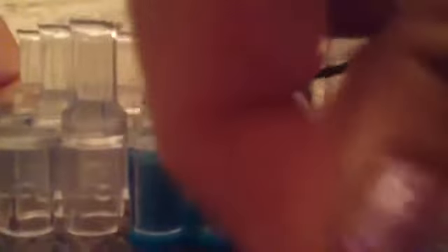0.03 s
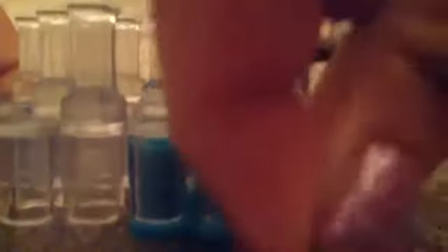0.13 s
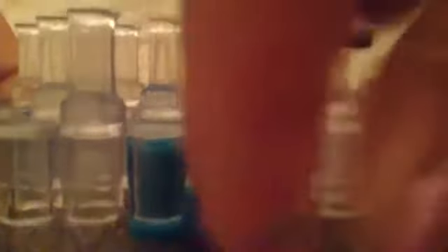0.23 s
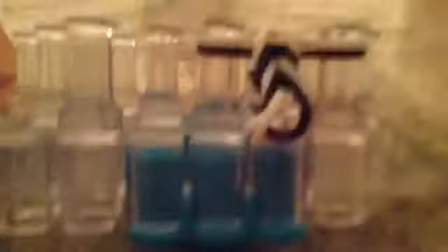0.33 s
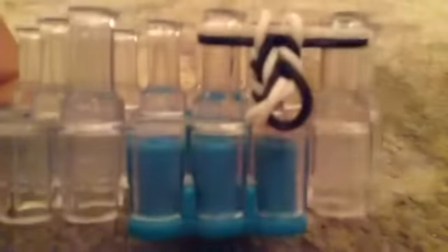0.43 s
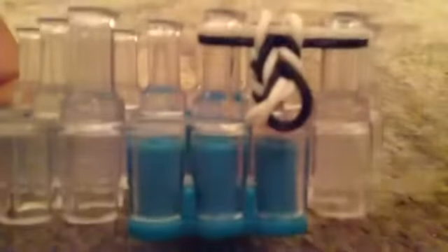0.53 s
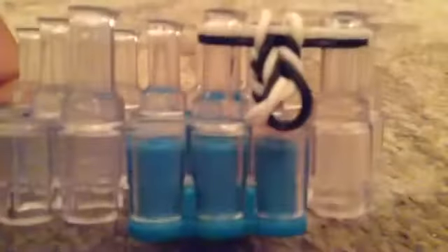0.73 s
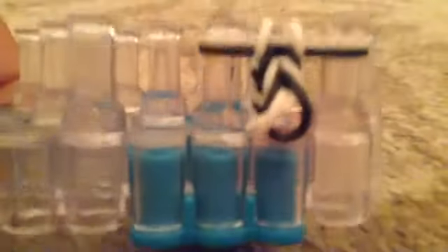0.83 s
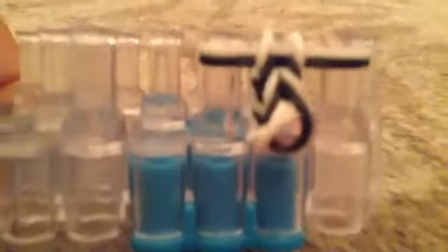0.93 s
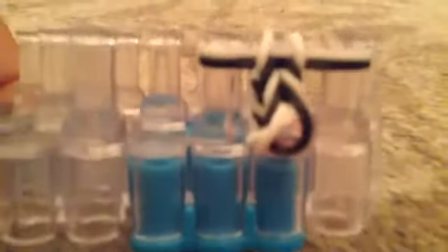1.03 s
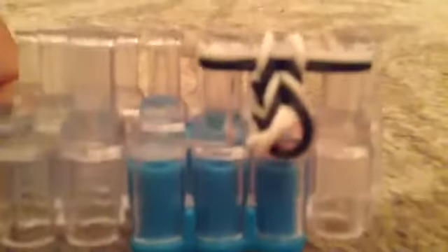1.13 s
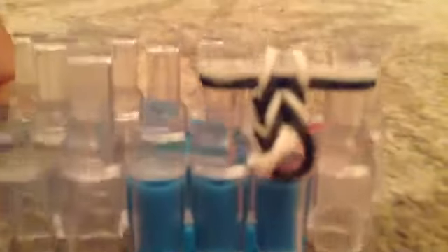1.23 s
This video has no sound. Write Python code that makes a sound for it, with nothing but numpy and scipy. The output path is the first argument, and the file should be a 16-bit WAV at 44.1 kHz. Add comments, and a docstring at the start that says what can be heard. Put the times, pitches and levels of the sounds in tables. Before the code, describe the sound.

A plastic hook working rubber bands on a pegged loom: a soft knock, a sharp double click, brief rubbery rasp, then a loud hollow snap with small clicks, fading to low hum in a small room, very close microphone.

```python
"""A knock over a low, noisy room hum, then a burst of clicks: a small plastic hook works rubber bands
over the pegs of a plastic loom on a table, very close by. Blows ring the modes of pegs and loom;
random catches make the rasp and rubbing of the bands; decaying sines make their brief twangs.
Shaped noise makes hum, hiss and the rumble of handling. At the end mostly hum and faint hiss remain."""
import sys
import numpy as np
from scipy import signal
from scipy.fft import rfft, irfft
from scipy.io import wavfile

SR = 44100
rng = np.random.default_rng(int(sys.argv[2]) if len(sys.argv) > 2 else 0)


def dump_mix(stems):
    """Bounce the given channels to the path in sys.argv[1] as a 16-bit WAV at rate SR."""
    frames = np.atleast_2d(stems).T  # one column per channel
    limited = np.clip(frames, -1, 1)  # hard clip at full scale
    pcm = np.round(limited * 32767).astype(np.int16)
    wavfile.write(sys.argv[1], SR, pcm)


N = 57330
T = np.arange(N) / SR   # s

# Colours are relative spectral densities; coloured() scales them to unit power.
# room hum, colour: freq_hz, density_db_per_hz
HUM_COLOUR = [(30, -61.5), (60, -54), (90, -39), (115, -20.5), (155, -7), (210, 1.5), (310, 4.5),
              (360, -5.5), (425, -20.5), (600, -34.5), (3000, -70.5)]
# room hum, level: time_s, level_db
HUM_LEVEL = [(0, -54), (.12, -50), (.45, -55), (.62, -52), (.78, -55.5), (.92, -51), (1.09, -50),
             (1.18, -54.5), (1.3, -56)]
# upper register of the hum, colour: freq_hz, density_db_per_hz
UPPER_HUM_COLOUR = [(300, -32), (460, -5), (590, 0), (720, -4.5), (900, -9.5), (1250, -13), (1600, -25.5),
                    (3000, -44.5)]
# upper register of the hum, level: time_s, level_db
UPPER_HUM_LEVEL = [(0, -60), (.12, -62.5), (.55, -62.5), (.76, -67.5), (.9, -67), (1.05, -63.5),
                   (1.15, -65), (1.3, -65)]
# hiss, colour: freq_hz, density_db_per_hz
HISS_COLOUR = [(500, -5), (2000, -6), (4200, -7.5), (7000, -9), (15000, -10)]
# room tail, colour: freq_hz, density_db_per_hz
ROOM_COLOUR = [(100, 9.5), (300, -3), (700, -3), (1500, -6), (4000, -6.5), (8000, -1.5), (15000, -5)]
# hands shift the loom, colour: freq_hz, density_db_per_hz
HANDLING_COLOUR = [(30, -43.5), (60, -36), (100, -6.5), (150, 6), (230, -1), (330, -0.5), (450, -19),
                   (900, -29), (3000, -48)]
# hands shift the loom, level: time_s, level_db
HANDLING_LEVEL = [(0, -59.5), (.08, -82), (.18, -70), (.32, -55), (.40, -52), (.46, -55), (.51, -76),
                  (.56, -45.5), (.64, -66), (.72, -65.5), (.86, -77), (.94, -55.5), (1.02, -71),
                  (1.3, -74.5)]
# hook rubs along a band, colour: freq_hz, density_db_per_hz
RUB_COLOUR = [(150, -13), (700, 11.5), (2000, 0), (4300, 0), (6500, -8.5), (10000, -10.5), (15000, -15.5)]
# hook rubs along a band, level: time_s, level_db
RUB_LEVEL = [(0, -73), (.15, -78.5), (.19, -55), (.225, -53.5), (.255, -66), (.29, -55), (.335, -59.5),
             (.37, -60), (.405, -45.5), (.44, -49.5), (.46, -61.5), (.53, -67), (.65, -78.5)]
# stretched band slips over a peg, colour: freq_hz, density_db_per_hz
RASP_COLOUR = [(200, -1.5), (900, 0), (1900, -7.5), (2900, -1), (3900, -10.5), (5200, 0), (7500, 2),
               (9500, -4.5), (11000, -17), (15000, -19)]
# stretched band slips over a peg: start_s, level_db
SLIPS = [(0.2923, -27.5), (.2960, -28.5), (0.2993, -33)]
# band rings after letting go: start_s, pitch_hz, level_db
TWANGS = [(0.201, 155, -29), (.2940, 199.5, -28.5), (.3100, 195, -39), (0.438, 302, -31.5),
          (.4640, 201, -47)]
# loom knocks on the table: start_s, level_db, brightness_hz
KNOCKS = [(.0170, -0.5, 1030), (0.1953, 6.5, 1500), (.2008, 5.5, 2270), (0.2039, 9, 350), (0.349, -8, 1400),
          (0.3988, -0.5, 800), (0.4139, 28.5, 802), (0.4383, 4.5, 650), (.4792, 3.5, 1200),
          (0.4841, 3.5, 1310)]
# resonances of the loom on the table: freq_hz, width_hz, level_db
LOOM_MODES = [(158, 68, -9.5), (235.3, 106, 0), (336, 72, 1), (490, 59, -5), (662, 62, -9), (850, 220, -15),
              (1030, 120, -9), (1400, 330, -27)]
# hook meets peg; 0.4222 and 0.4245 s: the 0.4130 s snap reflected from table or wall:
# start_s, level_db, brightness_hz, contact_pitch_hz
CLICKS = [(.2008, 6.5, 4150, 2250), (0.203, -3.5, 5500, 2600), (0.2069, -21, 14900, 5400),
          (0.232, -31.5, 11000, 4500), (.2440, -33.5, 11000, 7000), (0.3056, -19.5, 7000, 3000),
          (.3198, -19.5, 4280, 3400), (.3495, -11.5, 3400, 2700), (0.3862, -22, 6100, 4200),
          (0.3944, -15.5, 5490, 3800), (.4130, 7, 17000, 1770), (0.4222, -6, 4960, 3700),
          (.4245, -9.5, 5500, 3600), (0.4307, -16, 16000, 11000), (0.4495, -20, 14100, 5800),
          (0.4938, -31, 14900, 7000), (.9770, -34.5, 4970, 3900)]
# resonances of the pegs: freq_hz, width_hz, level_db
PEG_MODES = [(573.6, 222, 0), (890, 360, 3.5), (1800, 540, -1.5), (2640, 870, -6), (3620, 800, -4),
             (4904, 600, 1.5), (7000, 390, -5.5), (8070, 910, -5), (10000, 1000, -7), (11690, 400, -11),
             (13320, 410, -7), (14650, 320, -8)]

HISS_DB = -72.5
ROOM_DB, ROOM_T60_S, ROOM_DELAY_S = -27, 0.36, 0.005
CATCHES_PER_S = 7000   # mean rate, rasp and rubbing
SLIP_RISE_S, SLIP_FALL_S = 0.0012, 0.0018
TWANG_RISE_S, TWANG_T60_S = 0.003, 0.073
GRIT, GRIT_S = 0.48, 0.0021   # scuff in a click: norm against a unit impulse, decay time
MODE_SPREAD_DB = 1.5   # change of each mode from blow to blow, standard deviation
CONTACT_DB, CONTACT_Q = 1.5, 5.4   # each click stresses one pitch
LOW_CUT_HZ, CUTOFF_HZ = 131, 15300


def from_db(db):
    """Decibels to amplitude gain."""
    return 10 ** (np.asarray(db) / 20)


def rms_one(x):
    """Scale to unit power."""
    return x / np.sqrt(np.mean(x ** 2) + 1e-20)


def level(rows):
    """Gain through (time_s, level_db) points, linear in dB."""
    return from_db(np.interp(T, *np.transpose(rows)))


def coloured(x, points):
    """Filter to (freq_hz, density_db_per_hz) points, log frequency; unit power."""
    freq_hz, density_db = np.transpose(points)
    bins_hz = np.maximum(np.fft.rfftfreq(N, 1 / SR), 1)
    gain_db = np.interp(np.log(bins_hz), np.log(freq_hz), density_db)
    return rms_one(irfft(rfft(x) * from_db(gain_db), N))


def cut(x, cutoff_hz, kind):
    """Second-order low- or high-pass."""
    sos = signal.butter(2, min(cutoff_hz, SR * 9 / 20), kind, fs=SR, output="sos")
    return signal.sosfilt(sos, x + 1e-18)


def resonate(x, freq_hz, width_hz):
    """Two-pole resonance, about unit gain at its peak."""
    radius = np.exp(-np.pi * width_hz / SR)
    zeros = np.array([1, 0, -1]) * (1 - radius * radius) / 2
    poles = [1, -2 * radius * np.cos(2 * np.pi * freq_hz / SR), radius * radius]
    return signal.lfilter(zeros, poles, x + 1e-18)


def background():
    """Low room hum in two registers of swelling noise, under a thin steady hiss."""
    low, upper, hiss = rng.standard_normal((3, N))
    hum = coloured(low, HUM_COLOUR) * level(HUM_LEVEL)
    upper_hum = coloured(upper, UPPER_HUM_COLOUR) * level(UPPER_HUM_LEVEL)
    return hum + upper_hum + from_db(HISS_DB) * coloured(hiss, HISS_COLOUR)


def room(x):
    """Faint diffuse tail of a small room: convolution with decaying noise."""
    decay = from_db(-60 * T / ROOM_T60_S) * (T > ROOM_DELAY_S)
    tail = coloured(rng.standard_normal(N), ROOM_COLOUR) * decay
    tail /= np.linalg.norm(tail)
    return from_db(ROOM_DB) * signal.fftconvolve(x, tail)[:N]


def handling():
    """Dull rumble as the loom shifts under the fingers."""
    return coloured(rng.standard_normal(N), HANDLING_COLOUR) * level(HANDLING_LEVEL)


def rubbing():
    """Fine friction grains of random size as the hook rubs along a band."""
    grains = (rng.random(N) < CATCHES_PER_S / SR) * rng.standard_normal(N)
    return coloured(grains, RUB_COLOUR) * level(RUB_LEVEL)


def band_rasp():
    """Rubber sticks and slips on plastic in short spurts of tiny catches."""
    catches = (rng.random(N) < CATCHES_PER_S / SR) * rng.choice([-1, 1], N)
    spurts = np.zeros(N)
    for start_s, level_db in SLIPS:
        age_s = T - start_s
        rise = np.clip(age_s / SLIP_RISE_S, 0, 1)
        fall = np.exp(-np.maximum(age_s - SLIP_RISE_S, 0) / SLIP_FALL_S)
        spurts += from_db(level_db) * rise * fall
    return coloured(catches, RASP_COLOUR) * spurts


def band_twangs():
    """A freed band swings as a decaying sine."""
    out = np.zeros(N)
    for start_s, pitch_hz, level_db in TWANGS:
        age_s = np.maximum(T - start_s, 0)
        envelope = from_db(level_db - 60 * age_s / TWANG_T60_S) * np.minimum(age_s / TWANG_RISE_S, 1)
        out += envelope * np.sin(2 * np.pi * pitch_hz * age_s)
    return out


def push(start_s, level_db, brightness_hz, grit):
    """One blow or its reflection: impulse plus decaying scuff noise, low-passed at its brightness."""
    pulse = rng.standard_normal(N) * np.exp(-abs(T - start_s) / GRIT_S) * (T >= start_s)
    pulse *= grit / np.linalg.norm(pulse)
    pulse[int(start_s * SR)] += 1
    for _ in range(2):
        pulse = cut(pulse, brightness_hz, "low")
    return from_db(level_db) * pulse


def strike(pushes, modes, alternate):
    """Pushes ring all modes of a body, each push in slightly different proportions."""
    shares = from_db(MODE_SPREAD_DB * rng.standard_normal((len(pushes), len(modes))))
    out = np.zeros(N)
    for k, (freq_hz, width_hz, level_db) in enumerate(modes):
        sign = (-1) ** (k * alternate)   # alternate: every other mode inverted
        drive = shares[:, k] @ np.array(pushes)
        out += sign * from_db(level_db) * resonate(drive, freq_hz, width_hz)
    return out


def loom_knocks():
    """The whole loom jolts on the table: clean blows ring low modes as a short hollow thud."""
    pushes = [push(start_s, level_db, brightness_hz, 0) for start_s, level_db, brightness_hz in KNOCKS]
    return strike(pushes, LOOM_MODES, alternate=False)


def peg_clicks():
    """Hook snaps on hard plastic, and two reflections: gritty pulses, stressed at one pitch, ring modes."""
    pushes = []
    for start_s, level_db, brightness_hz, contact_hz in CLICKS:
        pulse = push(start_s, level_db, brightness_hz, GRIT)
        contact = resonate(pulse, contact_hz, contact_hz / CONTACT_Q)
        pushes.append(pulse + from_db(CONTACT_DB) * contact)
    return strike(pushes, PEG_MODES, alternate=True)


def scene():
    """Hook, bands and loom with room tail, over background and handling."""
    floor = background() + handling()
    contacts = peg_clicks() + loom_knocks()
    bands = band_rasp() + band_twangs() + rubbing()
    craft = cut(contacts + bands, LOW_CUT_HZ, "high")
    return (craft + room(craft) + floor)[None]


def record(dry):
    """Steep elliptic low-pass: 0.2 dB ripple, 70 dB stop band."""
    sos = signal.ellip(10, 0.2, 70, CUTOFF_HZ, fs=SR, output="sos")
    return signal.sosfilt(sos, dry)


dry = scene()
out = record(dry)
dump_mix(out)
```